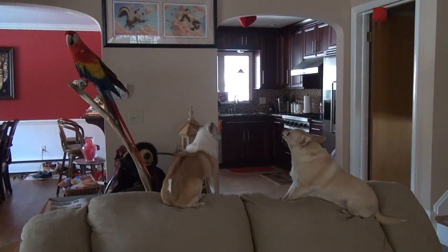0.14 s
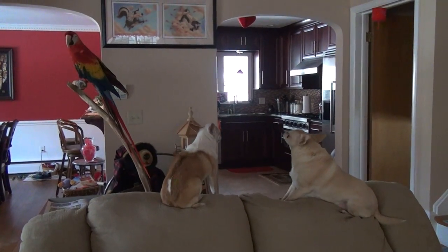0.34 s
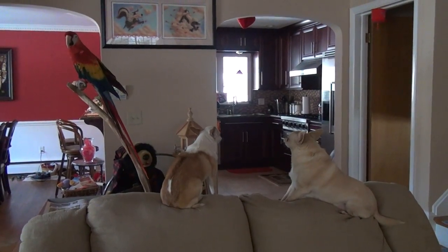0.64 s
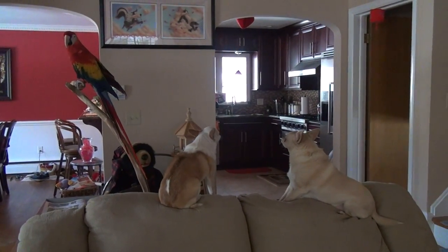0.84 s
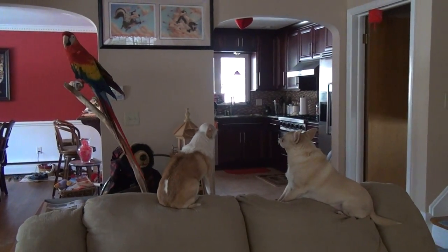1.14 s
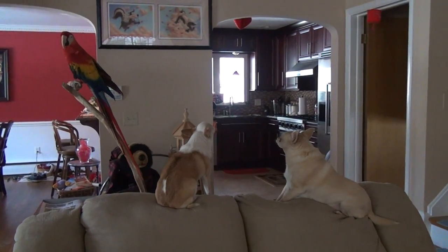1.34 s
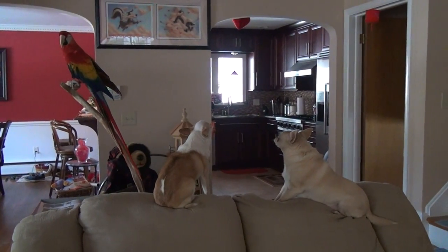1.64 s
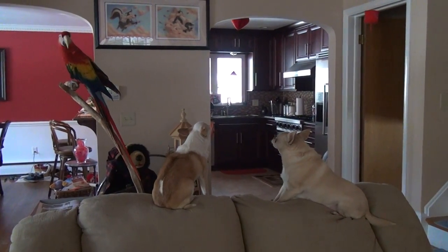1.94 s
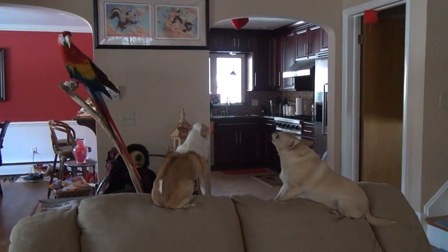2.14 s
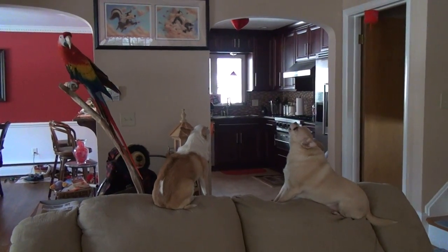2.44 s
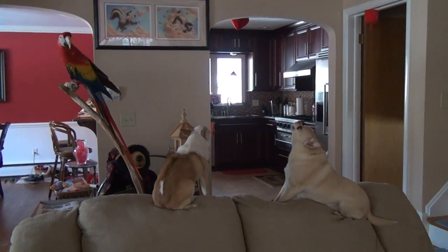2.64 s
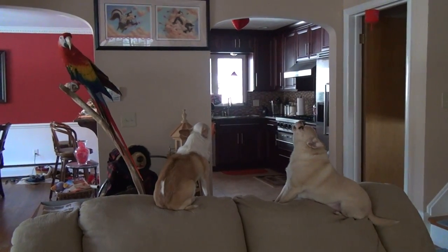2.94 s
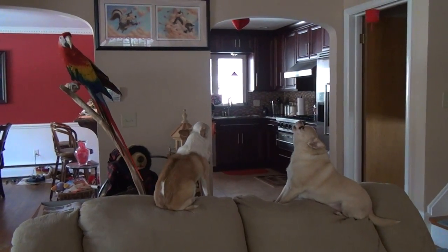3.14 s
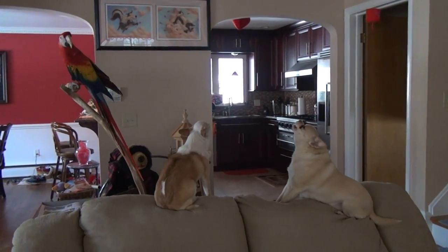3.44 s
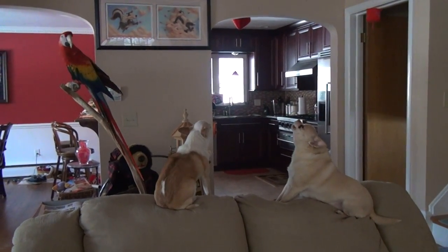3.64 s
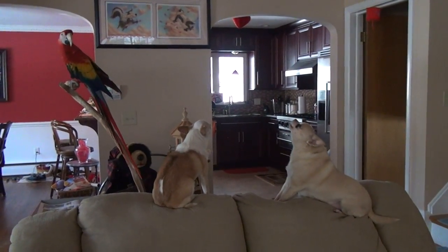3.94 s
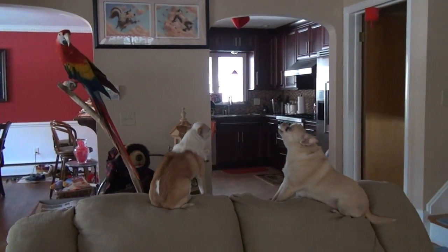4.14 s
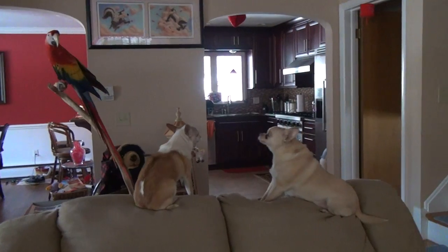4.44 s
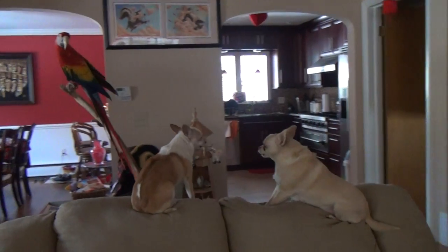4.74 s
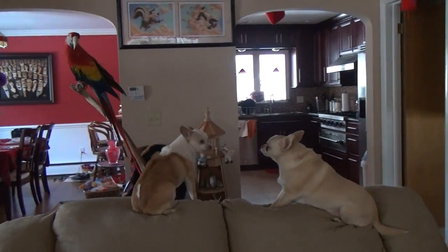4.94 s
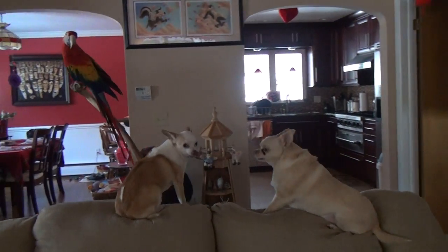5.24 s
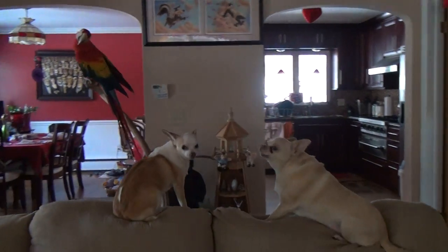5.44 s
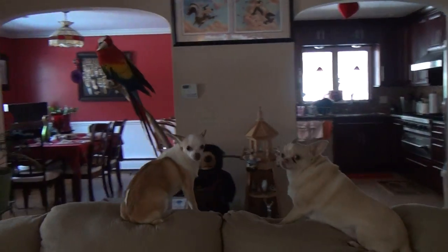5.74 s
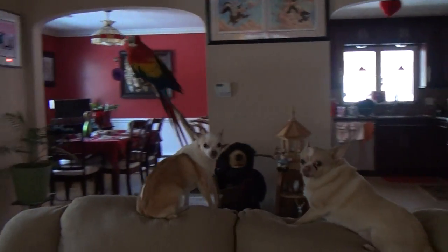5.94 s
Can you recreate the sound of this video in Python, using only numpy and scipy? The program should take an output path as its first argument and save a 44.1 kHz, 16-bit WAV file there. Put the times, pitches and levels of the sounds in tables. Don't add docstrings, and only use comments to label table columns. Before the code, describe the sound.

Steady wide house hiss and faint hum fill a living room opening onto a hard kitchen. At 0 s a small dog's clear whine, near 790 Hz, is already sounding and stops by 0.25, followed by a faint yelp at 0.3. Barely audible whimpers pass until a soft yelp at 1.9 and a second dog's rough, falling bark at 2.07. From 2.2 the first dog howls, clear and mellow, wavering down from about 800 to 530 Hz by 3.5, with a yelp underneath at 2.45; it cracks into a weak, hoarse moan until 4.07. A bright, loud yip snaps upward at 4.1-4.3. A soft rising yelp follows at 4.35, then short blown barks at 4.8 and 5.5, the last clearest. Light rustles, claw ticks and tiny whimpers fill the end. Half-second echoes surround everything; the distant microphone flattens barks and briefly ducks the hiss.

```python
import sys
import numpy as np
from scipy import signal
from scipy.fft import rfft, irfft, next_fast_len
from scipy.io import wavfile
from scipy.ndimage import uniform_filter1d, minimum_filter1d

SR = 44100
rng = np.random.default_rng(int(sys.argv[2]) if len(sys.argv) > 2 else 0)


def volts(x):
    e = np.asarray(x, float) / 20
    return 10 ** e


def persist_wave(psi):
    counts = np.round(np.clip(psi, -1, 1) * 32767).astype(np.int16)
    wavfile.write(sys.argv[1], SR, np.atleast_2d(counts).T)


N = 268260

# (time [s], pitch [Hz], effort [dB], mouth opening [factor])
WHINE_PATH = [(0, 785.5, -24.5, 2.1), (.04, 789.9, -22, 2.45), (0.083, 784, -22, 0.64),
              (.125, 780.3, -21.5, 1.5), (.145, 739, -27, 1.3), (.21, 718.8, -30, .4),
              (.25, 756, -63, 0.55)]
HOWL_PATH = [(2.2, 803.4, -25.5, .7), (2.34, 786.2, -23.5, 1.32), (2.451, 762.6, -38.5, 1.88),
             (2.62, 797.2, -21.5, 1.46), (2.761, 738.4, -34, 1.24), (2.9, 637.7, -35, 1.08),
             (3.131, 592.6, -35.5, 1.04), (3.302, 686.6, -28, 1.3), (3.47, 531, -36, 0.6)]
MOAN_PATH = [(3.53, 497, -43, 0.66), (3.618, 454.6, -47.5, 1.05), (3.76, 427, -46.5, 0.95),
             (3.829, 480.8, -48, 1.55), (3.9, 476, -54.5, 1.48), (4.071, 463.7, -49, 1.4)]
YIP_PATH = [(4.08, 534.6, -36, .55), (4.096, 568.7, -27, 0.25), (4.13, 693, -16, 0.99),
            (4.15, 740.4, -19.5, 1.64), (4.183, 796.6, -16, 1.99), (4.212, 780.8, -22, 2.1),
            (4.252, 763.8, -20.5, .64), (4.29, 750, -64.5, .7)]
# (tilt [dB per octave], odd harmonics [dB per unit of mouth])
CALL_COLOURS = [
    (-4.5, -13.5),
    (-1.52, -14.5),
    (1.5, -2),
]
# (frequency [Hz], level [dB])
HOWLER_THROAT = [(300, -40), (430, -6), (800, 5.5), (1250, -13), (1600, -13.5), (2000, -17.5),
                 (2400, -32.5), (3100, -44), (3950, -40.5), (4700, -61), (5500, -44.5), (6800, -66),
                 (8500, -69.5), (10000, -77.5), (13500, -68), (16000, -81)]
# (frequency [Hz], reverberation time T60 [s])
ROOM_T60 = [(250, 0.65), (660, 0.49), (1700, 0.54), (4600, 0.39), (9000, 0.35), (15000, 0.29)]
# (frequency [Hz], level [dB])
STEREO_WIDTH = [(60, -17.5), (250, -17), (600, -11), (2000, -9), (6000, -10.5), (10500, -11.5),
                (11500, -35), (16000, -39.5)]
# (frequency [Hz], density [dB per Hz])
HISS_SPECTRUM = [(25, -20.5), (100, -18), (150, -7), (400, -3), (700, -2), (1400, -2.5), (2500, -8.5),
                 (5000, -10), (9000, -13), (11000, -12), (14000, -13.5), (16300, -7.5)]
# (centre [Hz], width [Hz], level [dB])
HUM_BANDS = [(124, 8, -94.5), (175, 12, -99.5), (200, 8, -92), (305, 8, -93.5), (562, 25, -88),
             (1340, 140, -81), (3900, 300, -90.5), (10800, 400, -96), (13720, 10, -87.5)]
# (time [s],
# length [s], first pitch [Hz], last pitch [Hz], level [dB])
WHIMPER_EVENTS = [(.503, .11, 401, 364, -68), (.633, 0.16, 400, 431, -68), (1.813, 0.0642, 1453, 1366, -61),
                  (1.975, .11, 1116, 1214, -48.5), (2.68, 0.12, 560, 548, -60),
                  (3.59, .038, 1334, 1323, -64), (3.724, 0.2073, 586, 728, -50.5),
                  (4.693, 0.086, 370, 393, -63), (5.166, 0.086, 442, 471, -63),
                  (5.27, .18, 674, 552, -59.5), (5.991, 0.043, 453, 453, -67.5)]
# (time [s], length [s], first pitch [Hz], last pitch [Hz], level [dB])
SQUEAK_EVENTS = [(.023, 0.035, 1183, 1280, -46.5), (.517, 0.048, 1147, 1100, -68.5),
                 (.784, .06, 1123, 1100, -75), (.879, 0.087, 740, 659, -66.5), (1.5, 0.097, 541, 576, -74),
                 (1.654, .16, 1380, 1457, -72), (1.82, 0.014, 698, 598, -52),
                 (3.49, 0.053, 1827, 1865, -55.5), (3.675, .12, 2034, 1964, -64.5),
                 (4.04, 0.057, 200, 206, -62.5), (4.196, 0.018, 3900, 3330, -42.5)]
# (time [s], length [s], top pitch [Hz], end pitch [Hz], effort [dB])
YELPS = [
    (0.289, 0.076, 1097, 1024, -55),
    (1.884, 0.15, 936.6, 882, -48),
    (2.442, .22, 990, 853, -39.5),
    (4.337, .3, 980.5, 1186, -46.5),
]
# (frequency [Hz], level [dB])
YELP_THROAT = [(350, -41), (700, -4.5), (1000, -5), (1800, -10.5), (2300, -31.5), (3000, -23), (4000, -32),
               (5000, -40), (7000, -40), (9500, -54), (12000, -59), (16000, -74)]
# (time [s], length [s], level [dB], centre [Hz], width [octaves])
SCRAPE_EVENTS = [(.4, 0.044, -71.5, 2050, 0.47), (4.122, 0.092, -69, 14100, 0.126),
                 (4.391, 0.41, -67, 7250, 1), (4.57, .15, -63.5, 4050, .11),
                 (4.561, 0.21, -57.5, 810, 0.76), (5.292, 0.24, -70, 11200, 1),
                 (5.295, 0.1714, -59, 2386, 0.41), (5.496, 0.11, -52, 13340, 0.143),
                 (5.74, 0.233, -69.5, 7000, 0.206), (5.686, .28, -72.5, 12350, 0.2),
                 (5.985, 0.11, -63.5, 800, 0.44), (6.049, 0.0286, -86, 6230, 0.324)]
# (time [s], length [s], level [dB], centre [Hz], width [octaves])
CLAW_TICKS = [(.309, 0.00415, -68.5, 5000, 1.7), (0.357, .004, -80, 4082, 0.95),
              (3.722, 0.012, -68, 10800, 0.82), (4.729, 0.0224, -56.5, 5480, 1.1),
              (5.301, 0.0045, -56.5, 5800, 1.36), (5.387, 0.013, -58, 2293, 0.69),
              (6.017, .021, -58, 6400, 0.81)]
# (time [s], length [s], top pitch [Hz], end pitch [Hz], roughness [0-1])
BARK_EVENTS = [
    (2.07, .135, 571, 474.7, .36),
    (4.811, 0.13, 518.7, 549.1, 0.28),
    (5.496, 0.13, 525.2, 492, .2),
]
# (frequency [Hz], level [dB])
BARK_MOUTHS = [
    [(150, -61.5), (250, -50.5), (393, -12.5), (460, -34), (735, -15), (1020, 3), (1380, -17), (1790, -8.5),
     (2860, -24.5), (8400, -49.5), (9490, -63), (13700, -46), (16000, -68.5)],
    [(150, -70), (250, -48.5), (538, -35), (698, -25.5), (775, -16), (1100, -1), (1420, -16), (1550, -16.5),
     (1760, -13), (4050, -17), (5730, -31.5), (11900, -48.5), (16000, -60)],
    [(150, -67.5), (250, -46.5), (313, -34.5), (400, -44), (816, -14), (988, 1), (1310, -21.5), (3170, -14),
     (5440, -38.5), (6140, -43), (8120, -38.5), (13900, -65), (16000, -93)],
]
# (frequency [Hz], level [dB])
MICROPHONE_RESPONSE = [(14000, 0), (15000, -1.5), (16250, -13), (16450, -67)]


def evened(x):
    return x / np.sqrt(np.mean(x ** 2) + 1e-20)


def read(points, hz):
    f, value = np.transpose(points)
    return np.interp(np.log(hz + 1), np.log(f + 1), value)


def colour(x, points):
    size = next_fast_len(x.shape[-1], True)
    gain = volts(read(points, np.fft.rfftfreq(size, 1 / SR)))
    return irfft(rfft(x, size) * gain, size)[..., :x.shape[-1]]


def add(mix, s, sound):
    part = mix[round(s * SR):][:len(sound)]
    part += sound[:len(part)]


def spread(rows):
    s, *columns = np.transpose(rows)
    t = np.arange(s[0], s[-1], 1 / SR)
    return t, [np.interp(t, s, c) for c in columns]


def voice(hz, throat, rough, bright_db=0., odd_db=0., shake=0.054, patchy_db=2.5, follow=0):
    wobble, air = rng.standard_normal((len(hz), 2)).T
    rough = np.clip(rough, 0, 1)
    wobble = evened(uniform_filter1d(uniform_filter1d(wobble, size=150), size=150))
    turns = np.cumsum(hz * (1 + shake * rough * wobble)) / SR
    top_hz = hz.max()
    k = np.arange(1, int(16400 / top_hz) + 1)[:, None]

    coarse = slice(None, None, 32)
    slow_hz = hz[coarse]
    flicker = uniform_filter1d(rng.standard_normal((len(k), len(slow_hz))), size=30) * np.sqrt(30)
    opening = (slow_hz / top_hz) ** (follow * (k * top_hz < 1900))
    level_db = read(throat, k * slow_hz / opening)
    level_db = level_db + (bright_db[coarse] + patchy_db * flicker) * np.log2(k)
    level_db = level_db + odd_db[coarse] * (k % 2)
    heights = volts(level_db) / np.sqrt((volts(level_db) ** 2).sum(0) / 2)
    heights = np.repeat(np.float32(heights), 32, axis=1)[:, :len(hz)]

    phase = np.float32(2 * np.pi * (turns % 1)) * np.float32(k) + np.float32(.3 * k ** 2)
    folds = (uniform_filter1d(heights, size=33) * np.cos(phase)).sum(0)
    puffs = evened(colour((0.71 + np.exp(-(turns % 1) / .3)) * air, throat))
    return np.sqrt(1 - rough ** 2) * folds + rough * puffs


def sing(t, hz, effort_db, mouth, rough, throat, tilt_db=0., odd_db=-1.0):
    since_start = t - t[0] + (t[0] == 0)
    fade = np.clip(np.minimum(since_start, t[-1] - t) / 0.0073, 0, 1)
    bright_db = tilt_db + 5.4 * (mouth - 1)
    tone = voice(hz, throat, rough, bright_db=bright_db, odd_db=odd_db * (mouth - 1))
    return t[0], volts(effort_db) * fade * tone


def singer():
    clear_rough, hoarse_rough = 0.017, .45
    hoarse_s, hoarse_span_s = 3.7, 0.24
    out = np.zeros(N)
    for rows, call_colour in zip([WHINE_PATH, HOWL_PATH + MOAN_PATH, YIP_PATH], CALL_COLOURS):
        t, (hz, effort_db, mouth) = spread(rows)
        hz = uniform_filter1d(hz, round(.035 * len(t)) + 1, mode="nearest")
        rough = clear_rough + hoarse_rough * np.exp(-((t - hoarse_s) / hoarse_span_s) ** 2)
        add(out, *sing(t, hz, effort_db, mouth, rough, HOWLER_THROAT, *call_colour))
    return out


def room(x):
    taps = np.zeros((2, 32000))
    at = np.arange(160, 31980, 20) + rng.integers(0, 20, (2, 1591))
    np.put_along_axis(taps, at, rng.choice([-1., 1.], at.shape), 1)
    hz, t, z = signal.stft(taps, SR, nperseg=256)
    decay = volts(-60 * t / read(ROOM_T60, hz)[:, None])
    tail = signal.istft(z * decay, SR, nperseg=256)[1]
    return signal.oaconvolve(x[None], tail / np.linalg.norm(tail[0]), axes=1)[:, :N]


def hiss(dogs):
    sheen_db, duck_db_per_db, knee_db, recover_db_per_s = -0.5, .2, -49.5, 45
    size = next_fast_len(N, True)
    hz = np.fft.rfftfreq(size, 1 / SR)
    power = (volts(-69) * evened(volts(read(HISS_SPECTRUM, hz)))) ** 2
    for centre_hz, width_hz, db in HUM_BANDS:
        resonance = 1 / (1 + (2 * (hz - centre_hz) / width_hz) ** 2)
        power = power + (volts(db) * evened(resonance)) ** 2
    wide = rfft(rng.standard_normal((2, size))) * np.sqrt(power)
    wide[1] *= volts(3.0 + read(STEREO_WIDTH, hz))
    treble = irfft(wide * np.clip(hz / 4000 - .8, 0, 1), size)[:, :N]

    fall = np.arange(N) * recover_db_per_s / SR
    dogs_db = 10 * np.log10(abs(uniform_filter1d(dogs ** 2, size=2000)) + 1e-12)
    loud_db = np.maximum.accumulate(dogs_db + fall) - fall
    treble_gain = volts(sheen_db - duck_db_per_db * np.maximum(loud_db - knee_db, 0))
    return irfft(wide, size)[:, :N] + treble * (treble_gain - 1)


def whimpers(rows, rough):
    out = np.zeros(N)
    for s, length, first_hz, last_hz, db in rows:
        glide_hz = np.linspace(first_hz, last_hz, round(length * SR))
        flat_db = np.zeros(len(glide_hz))
        nose = [(0.7 * last_hz, -40), (.85 * last_hz, -1.5), (1.25 * first_hz, -1.5),
                (2.1 * first_hz, -24), (2.8 * first_hz, -60)]
        tone = voice(glide_hz, nose, rough, bright_db=flat_db, odd_db=flat_db)
        add(out, s, volts(db) * signal.windows.tukey(len(tone), .4) * tone)
    return out


def answerer():
    start_share, climb_s = 0.73, 0.04
    rise_db, fade_db = -3.5, -14.5
    out = np.zeros(N)
    for s, length, top_hz, end_hz, db in YELPS:
        t = np.arange(s, s + length, 1 / SR)
        up = np.clip((t - s) / climb_s, 0, 1)
        down = np.clip((t - s - climb_s) / (length - climb_s), 0, 1)
        climb = start_share + (1 - start_share) * np.sin(np.pi / 2 * up)
        hz = climb * (top_hz + (end_hz - top_hz) * down)
        effort_db = db + rise_db * np.maximum(1 - 2 * up, 0) + fade_db * down ** 2
        mouth = np.full(len(t), 0.87 - 0.01 * (db + 44))
        rough = .13 + 0.27 * down ** 2
        add(out, *sing(t, hz, effort_db, mouth, rough, YELP_THROAT, tilt_db=-0.5))
    return out


def rustles():
    out = np.zeros(N)
    for s, length, db, centre_hz, octaves in SCRAPE_EVENTS + CLAW_TICKS:
        count = round(length * SR)
        air, grain = rng.standard_normal((count + 2000, 2)).T
        bell = [(centre_hz * 2 ** (octaves * z), -4.3 * z ** 2) for z in np.linspace(-4, 4, 17)]
        scrape = evened(colour(air * volts(3.8 * grain), bell))
        add(out, s, volts(db) * scrape[:count] * signal.windows.tukey(count, .6))
    return out


def barker():
    start_share, climb_s, settle_s = 0.49, .052, .025
    level_db, rise_db, rise_s, fade_db = -15.5, -19.5, 0.01, -7.5
    shut_db, shut_s = -44.5, .038
    odd_clean_db, odd_rough_db, odd_front_db = -15.5, 24.5, 0.5
    tilt_db, tilt_change_db = -3, 0.4
    out = np.zeros(N)
    for (s, length, top_hz, end_hz, rough), mouth in zip(BARK_EVENTS, BARK_MOUTHS):
        t = np.arange(0, length + shut_s, 1 / SR)
        climb = start_share + (1 - start_share) * np.sin(np.pi / 2 * np.minimum(t / climb_s, 1))
        settle = np.exp(-np.maximum(t - climb_s, 0) / settle_s)
        hz = climb * (end_hz + (top_hz - end_hz) * settle)
        odd_db = odd_clean_db + odd_rough_db * rough + odd_front_db * (1 - t / length)
        effort_db = level_db + rise_db * np.exp(-t / rise_s) + fade_db * t / length
        effort_db = effort_db + shut_db * np.maximum(t - length, 0) / shut_s
        bright_db = tilt_db + tilt_change_db * t / length
        bark = voice(hz / 2, mouth, rough, bright_db=bright_db, odd_db=odd_db,
                     shake=.13, patchy_db=1.77, follow=0.55)
        add(out, s, volts(effort_db) * np.clip(t / 0.0039, 0, 1) * bark)
    return out


def scene():
    singing = volts(-1.0) * singer()
    barking = barker() + answerer()
    small = whimpers(WHIMPER_EVENTS, rough=.12) + whimpers(SQUEAK_EVENTS, rough=.4) + rustles()
    direct = singing + barking + small
    echo_mid, echo_side = room(volts(-4.0) * singing + volts(1.0) * barking + volts(-5.0) * small)
    side = colour(echo_side - 0.19 * singing - .1 * barking + .1 * small, STEREO_WIDTH)
    mid, side = np.array([direct + echo_mid, side]) + hiss(singing + barking)
    return np.array([mid + side, mid - side])


def top_cut(x):
    return signal.sosfilt(signal.butter(12, 16360, fs=SR, output="sos"), x)


def record(dry):
    peak_db = 20 * np.log10(-minimum_filter1d(-abs(dry).max(0), size=90) + 1e-9)
    fall = np.arange(N) * 39.0 / SR
    over_db = np.maximum(np.maximum.accumulate(peak_db + fall) - fall + 8.5, 0)
    held = dry / volts(0.83 * uniform_filter1d(over_db, size=90))
    thump = colour(held ** 2, [(12, -27.5), (30, -8.0), (120, -4), (300, 3.0), (600, -22.5), (2000, -71)])
    mix = colour(held + volts(-22.0) * thump, MICROPHONE_RESPONSE)
    return top_cut(mix)


dry = scene()
out = record(dry)
persist_wave(out)
```